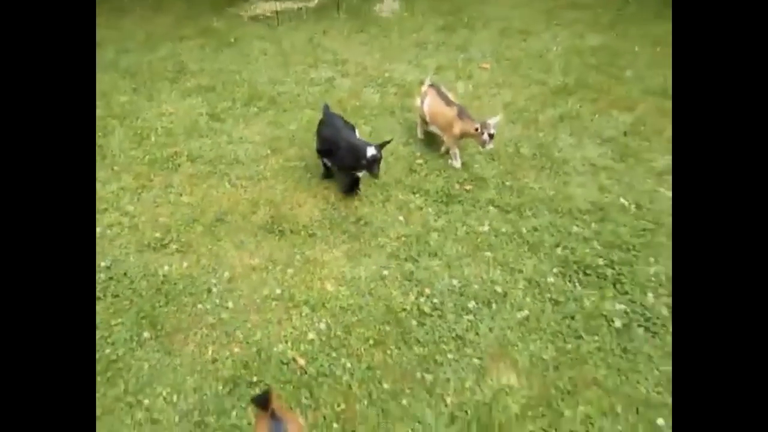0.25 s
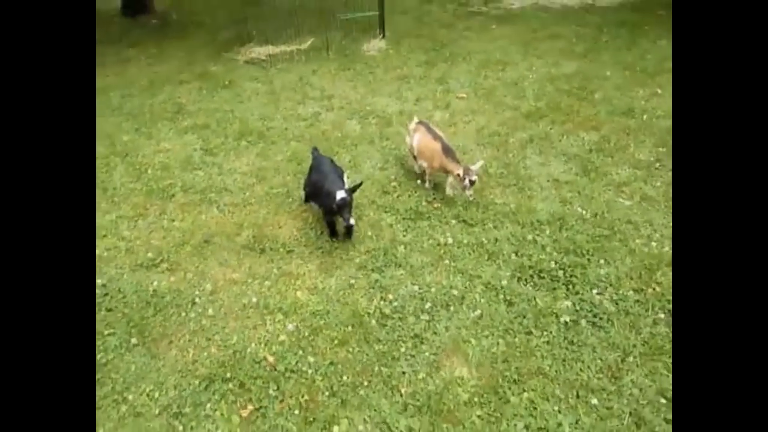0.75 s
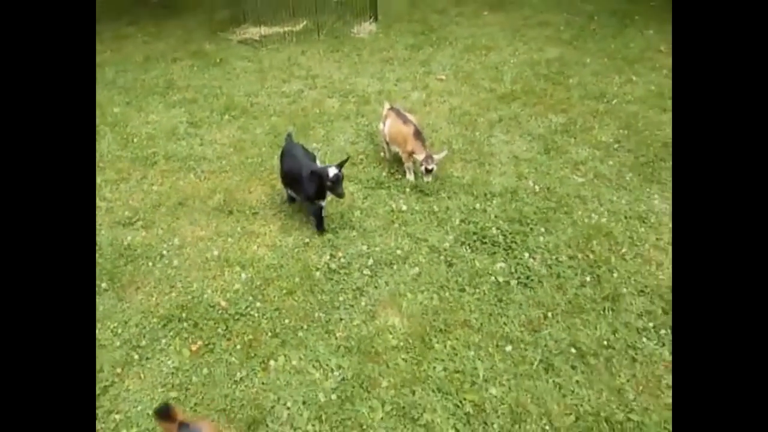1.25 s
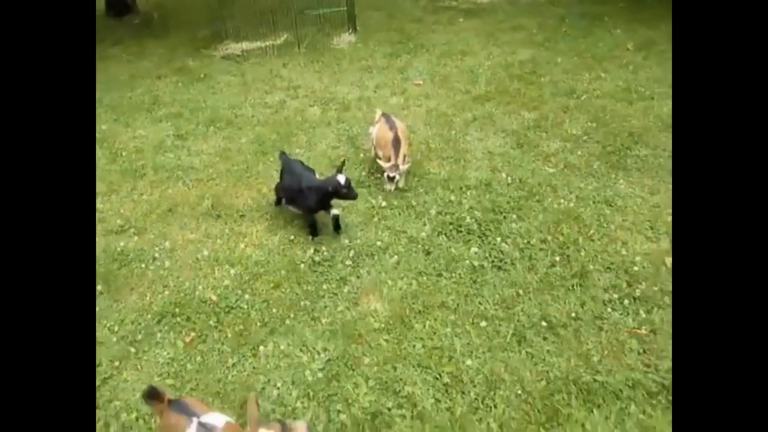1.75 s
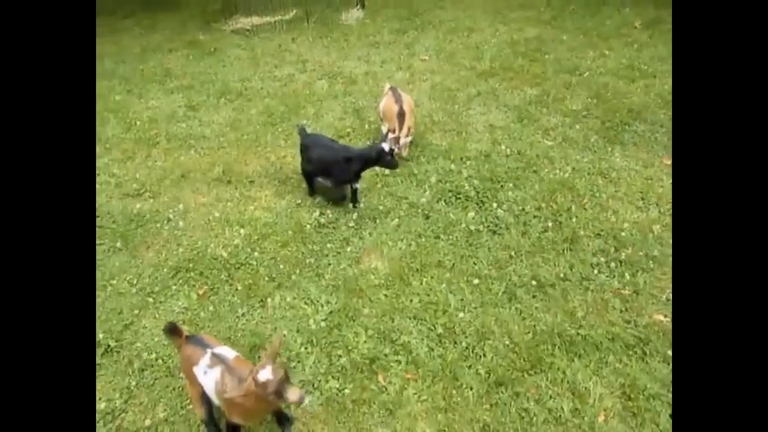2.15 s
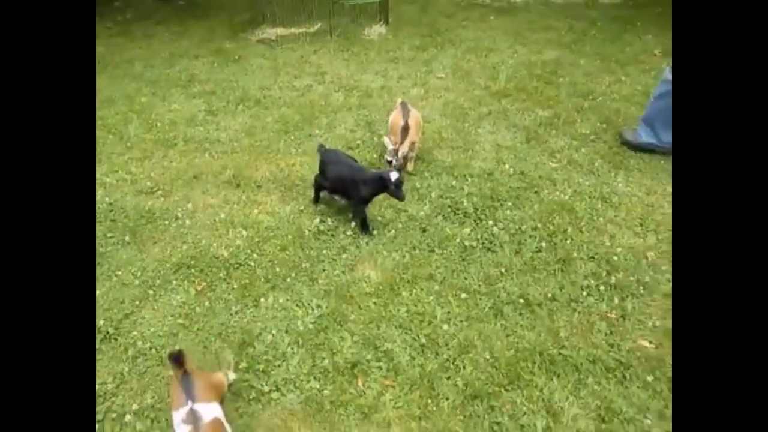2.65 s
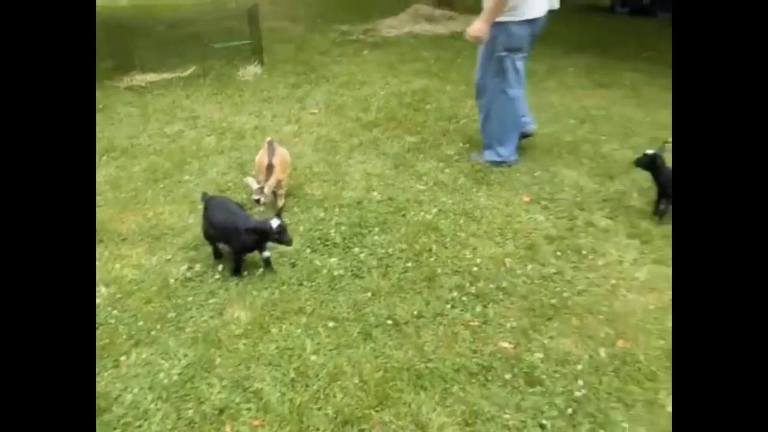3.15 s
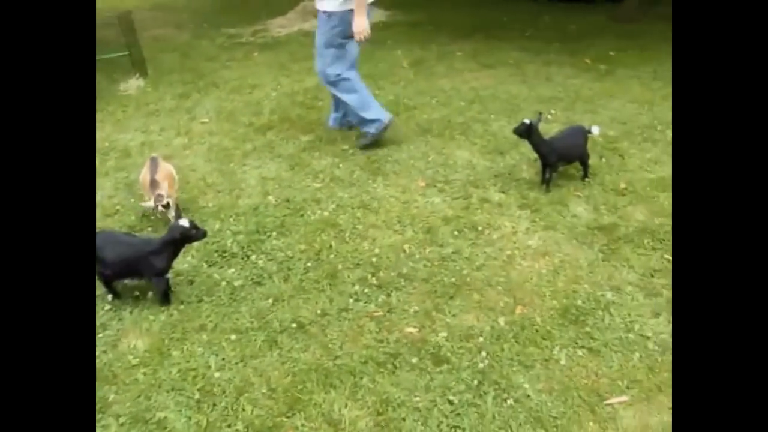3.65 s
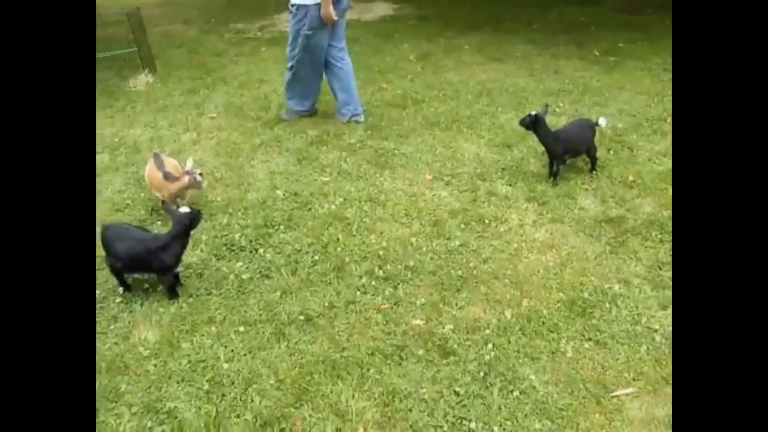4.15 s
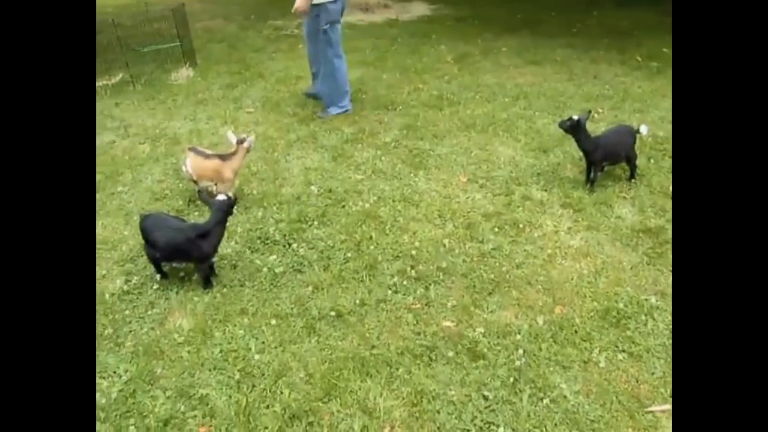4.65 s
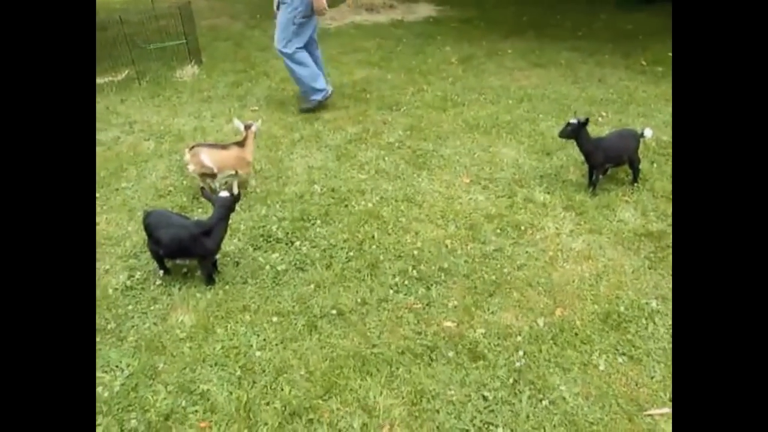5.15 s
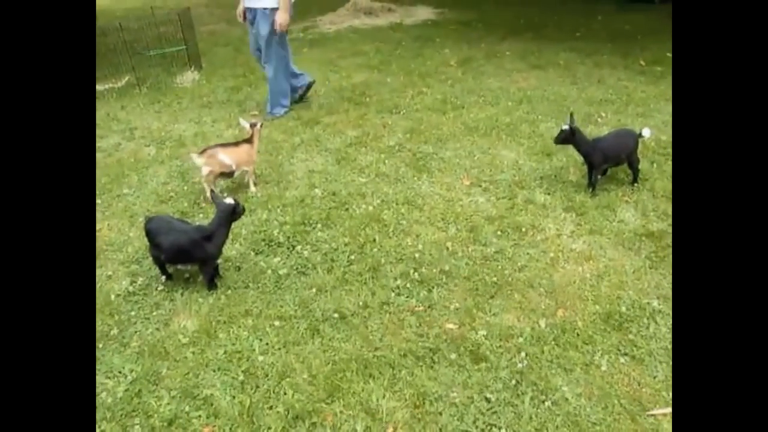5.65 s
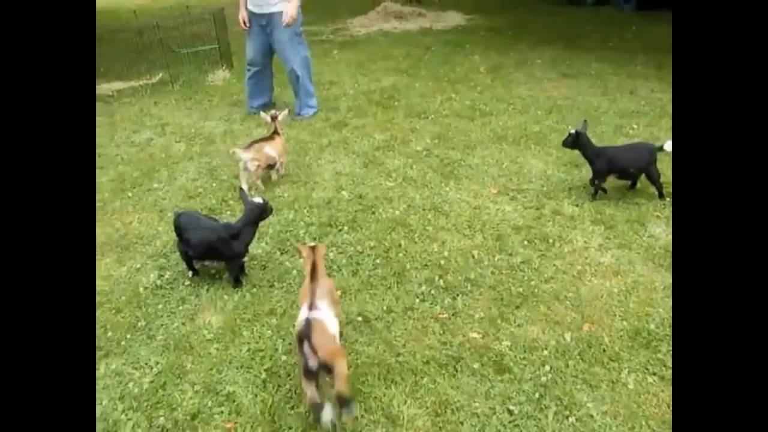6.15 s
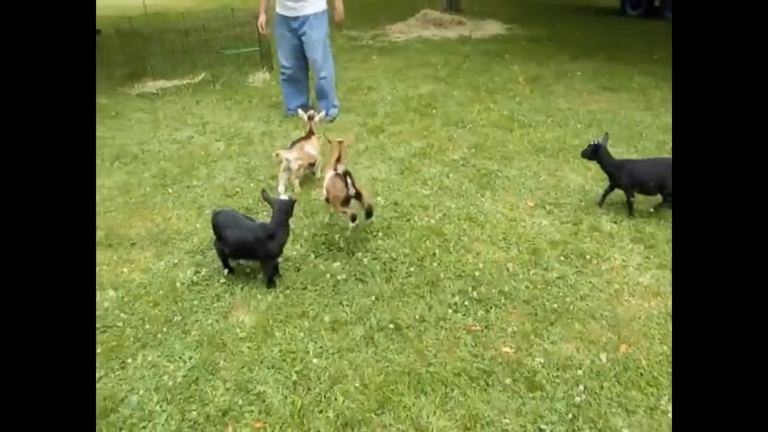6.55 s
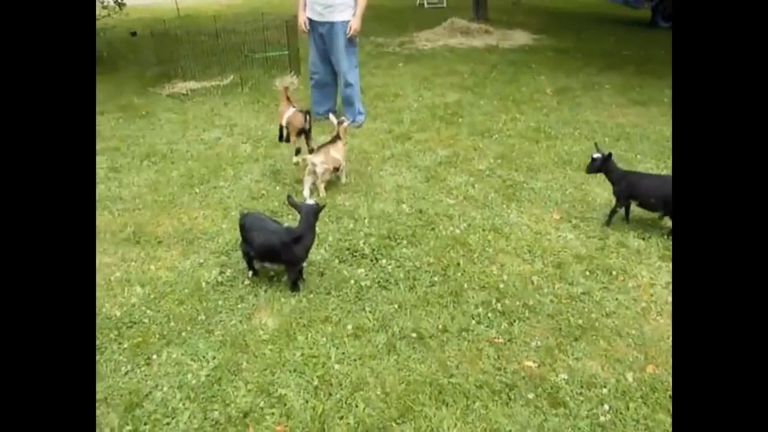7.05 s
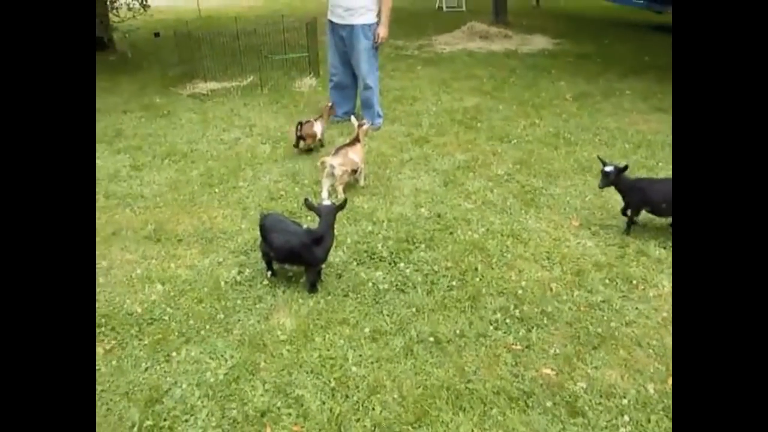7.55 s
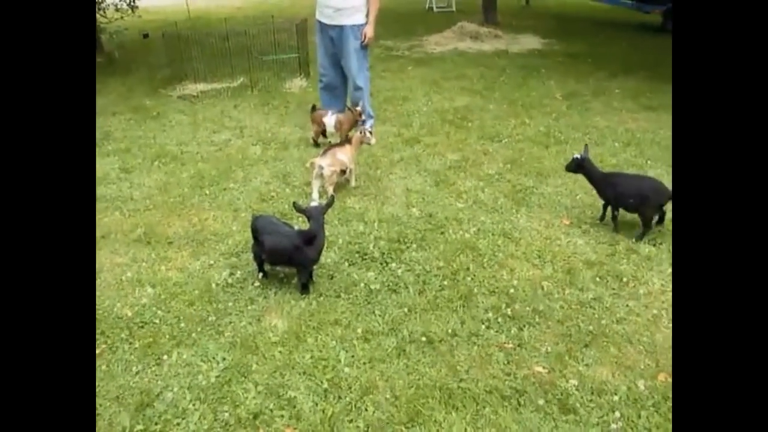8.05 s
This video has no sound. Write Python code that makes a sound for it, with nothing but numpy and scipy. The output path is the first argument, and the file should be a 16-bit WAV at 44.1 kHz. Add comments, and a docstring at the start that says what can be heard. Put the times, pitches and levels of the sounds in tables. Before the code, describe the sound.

Light wind rumble and a soft outdoor hiss run throughout, picked up by a hand-held camera with dull treble. For the first 1.5 seconds a hand bumps, rubs and squeaks on it, among tiny snaps and short high hisses. A goat kid bleats softly at about 0.7 seconds, and a faint quavering cry comes around 2.5. A low thud lands at 3. From 3.4 to 5.4 seconds come louder, close bleats, hoarse, nasal and throbbing, strongest near 3.6, 4.3 and 5. A thinner, shrill, trembling bleat swells at about 6 seconds. Stalks snap around 6.7, and dull hoof thuds on turf follow between 7 and 8. In the background one songbird repeats faint runs of falling chirps while another whistles short phrases farther off. A distant engine hum grows slowly louder until the end, just past 8 seconds.

```python
"""On a lawn, goat kids bleat in short quavering runs, close to a small hand-held camera.
Each bleat is a string of throbs: pushes of air that make the vocal folds buzz through the throat.
One songbird repeats falling chirps, another whistles farther off, stalks snap and hooves thud.
Wind rumbles, short high hisses come and go, and a far engine hums, slowly growing louder.
The hand on the camera bumps, squeaks and rubs, and the camera cuts off the high treble."""
import sys
import numpy as np
from scipy import signal
from scipy.fft import rfft, irfft, next_fast_len
from scipy.io import wavfile

SR = 44100
rng = np.random.default_rng(int(sys.argv[2]) if len(sys.argv) > 2 else 0)


def master(y):
    """Save y as 16-bit WAV."""
    cut = np.clip(np.atleast_2d(y).T, -1, 1)
    pcm = np.round(cut * 32767)  # scale
    wavfile.write(sys.argv[1], SR, pcm.astype(np.int16))


N = 366030
TIME = np.arange(N) / SR
TREBLE_LIMIT_HZ = 7150


def amp(db):
    """Turns decibels into a number to multiply by."""
    return 10 ** (np.asarray(db) / 20)


def unit(x):
    """Scales a signal to an average (rms) level of 1."""
    return x / np.sqrt(np.mean(x ** 2) + 1e-20)


def read(points, hz):
    """Looks up the level in dB at hz in a table of frequencies and levels."""
    f, db = np.transpose(points)
    return np.interp(np.log(hz + 1), np.log(f + 1), db)


def add(mix, start_s, sound):
    """Mixes a sound in from start_s."""
    start = round(start_s * SR)
    sound = sound[max(-start, 0):]
    part = mix[max(start, 0):][:len(sound)]
    part += sound[:len(part)]


def noise(colour, size):
    """Noise whose strength at each frequency follows colour(hz)."""
    full = next_fast_len(size)
    spectrum = rfft(rng.standard_normal(full)) * colour(np.fft.rfftfreq(full, 1 / SR))
    return unit(irfft(spectrum, full)[:size])


def wander(hz, size):
    """A smooth random wobble, up to about hz times a second."""
    return noise(lambda f: 1 / (1 + (f / hz) ** 4), size + 4096)[:size]


def band(hz, octaves):
    """A colour for noise: one broad hump around hz."""
    return lambda f: 1 / (1 + (np.log2((f + 1) / hz) / octaves) ** 2)


def ring(f, hz, height, half_width_hz=240):
    """A resonance: a peak at hz that falls away on both sides."""
    return height / (1 + ((f - hz) / half_width_hz) ** 2)


def swell(rise_s, fall_s):
    """Time around a peak: t in seconds, and u counted in rises (before it) or falls (after it)."""
    t = np.arange(-4 * rise_s, 4 * fall_s, 1 / SR)
    return t, np.where(t < 0, t / rise_s, t / fall_s)


def beats(first_s, last_s, gap_s):
    """Even times from first to last, about gap_s apart."""
    return np.linspace(first_s, last_s, round((last_s - first_s) / gap_s) + 1)


# The colour of the outdoor hiss: frequency_hz, relative_db
AIR_COLOUR = [(12, -36.5), (20, 5.5), (65, -8), (82, 4.5), (130, -5), (194, -9.5), (401, -12), (462, -13.5),
              (570, -14), (656, -16), (1020, -15), (1490, -19), (2670, -22.5), (4270, -27), (5400, -28.5),
              (7020, -61), (11900, -120)]
# How hard the wind blows on the microphone: time_s, level_db
WIND_LEVELS = [(0, -36.5), (1.4, -40.5), (1.65, -47.5), (2.2, -37.5), (2.7, -40.5), (5.6, -42.5),
               (6.9, -41), (7.5, -35), (8.3, -37)]
def air(hiss_db=-42, leaves_db=-52):
    """Outdoor hiss, lumpy wind rumble and a slight stir of leaves."""
    hiss = noise(lambda f: amp(read(AIR_COLOUR, f)) * f / (f + 90), N) * amp(.5 * wander(11, N))
    wind_db = np.interp(TIME, *np.transpose(WIND_LEVELS)) + wander(4.9, N)
    rumble = noise(band(44, .4), N) * amp(wind_db)
    leaves = noise(band(3500, 1), N) * amp(wander(17, N))
    return amp(hiss_db) * hiss + rumble + amp(leaves_db) * leaves


# The engine's blurred upper tones: pitch_hz, half_width_hz, relative_db
ENGINE_TONES = [(117, 8.7, -9.5), (467.7, 17, -7.5), (920, 40, -12), (1010, 78, -28)]
# The colour of its roar: frequency_hz, relative_db
ROAR_COLOUR = [(60, -2.5), (120, 1.5), (300, -5), (550, 5), (800, 4), (1100, 5), (1500, -12.5),
               (2500, -22.5), (5000, -41)]
# How the whole engine swells: time_s, gain_db
ENGINE_SWELL = [(0, -68.5), (1.7, -56), (2.2, -53), (3.2, -50.5), (4.5, -45), (5.5, -48), (6.3, -43.5),
                (7.4, -44.5), (8.3, -42.5)]
def engine(firing_hz=58, firing_db=2.8, roar_db=-2, drift_hz=2.7, unsteady_db=5):
    """A far engine: its wavering firing note, upper tones and dull roar swell together."""
    phase = 2 * np.pi * np.cumsum(firing_hz + drift_hz * wander(7.2, N)) / SR
    sound = amp(firing_db) * unit(np.sin(phase) * amp(unsteady_db * wander(6.2, N)))
    for hz, half_width_hz, db in ENGINE_TONES:
        sound += amp(db) * noise(lambda f: ring(f, hz, 1, half_width_hz), N)
    sound += amp(roar_db) * noise(lambda f: amp(read(ROAR_COLOUR, f)), N)
    return sound * amp(np.interp(TIME, *np.transpose(ENGINE_SWELL)))


BUMP_HZ, BUMP_S = 48.5, .0089
def thump(peak_s, db, hz):
    """A low swing that dies almost at once; higher ones are shorter."""
    half_length_s = BUMP_S * np.sqrt(BUMP_HZ / hz)
    t, u = swell(half_length_s, half_length_s)
    return peak_s + t[0], amp(db) * .5 ** (abs(u) ** 1.45) * np.cos(2 * np.pi * hz * t)


# Bumps of the hand: peak_s, level_db
BUMPS = [(0.029, -18.5), (.108, -21.5), (0.285, -16.5), (0.459, -24), (.552, -25), (0.826, -24),
         (1.132, -22), (1.206, -20), (1.311, -21), (1.405, -22), (2.203, -25), (3, -18), (3.072, -19.5)]
def camera_bumps():
    """The hand rocks the camera, always at the same low pitch."""
    out = np.zeros(N)
    for peak_s, db in BUMPS:
        add(out, *thump(peak_s, db, BUMP_HZ))
    return out


# Snapping stalks and small knocks: start_s, level_db, decay_s, centre_hz
SNAPS = [(0.0715, -27, 0.0018, 4600), (0.147, -26.5, 0.0048, 2490), (0.789, -33, .009, 1880),
         (2.526, -21, 0.0019, 870), (3.969, -31.5, 0.03, 330), (3.976, -34.5, 0.0061, 2600),
         (6.608, -33, 0.018, 4350), (6.644, -31.5, 0.0024, 4000), (6.733, -30, 0.0045, 3760)]
def stalk_snaps():
    """Each snap is a burst of noise that starts sharply and dies fast."""
    out = np.zeros(N)
    t = np.arange(SR // 20) / SR
    for start_s, db, decay_s, hz in SNAPS:
        add(out, start_s, amp(db) * np.exp(-t / decay_s) * noise(band(hz, octaves=.7), len(t)))
    return out


def glides(notes, waver, waver_hz, octave_db):
    """Unsteady sliding tones, each with one overtone an octave up."""
    out = np.zeros(N)
    for start_s, db, length_s, first_hz, last_hz in notes:
        size = int(length_s * SR)
        hz = np.geomspace(first_hz, last_hz, size) * (1 + waver * wander(waver_hz, size))
        phase = 2 * np.pi * np.cumsum(hz) / SR
        tone = unit(np.sin(phase) + amp(octave_db) * np.sin(2 * phase))
        add(out, start_s, amp(db) * tone * np.sin(np.linspace(0, np.pi, size)))
    return out


# Squeaks of skin: start_s, level_db, length_s, first_hz, last_hz
SQUEAKS = [(.139, -32, 0.014, 2027, 2870), (.234, -26, 0.017, 1010, 1460), (.246, -25.5, 0.026, 1480, 3370)]
def skin_squeaks():
    """Skin slips on the camera with tiny, rough, rising tones."""
    return glides(SQUEAKS, waver=.17, waver_hz=688, octave_db=-7.5)


def grainy_swell(peak_s, db, half_length_s, colour, grain_db=2.5):
    """Grainy noise that swells and fades."""
    t, u = swell(half_length_s, half_length_s)
    grains = unit(noise(colour, len(t)) * amp(grain_db * wander(220, len(t))))
    return peak_s + t[0], amp(db) * .5 ** (u ** 2) * grains


# Rubs of the hand: peak_s, level_db, half_length_s, scuff_hz
RUBS = [(.16, -38, .032, 2530), (0.275, -34.5, 0.029, 554), (0.343, -31.5, 0.038, 3010),
        (0.427, -31, 0.042, 510), (0.832, -37.5, 0.037, 1090), (1.419, -50.5, .04, 1240),
        (1.962, -42.5, .075, 1880), (4.02, -39, 0.071, 3050)]
# The colour all rubs share: frequency_hz, relative_db
RUB_COLOUR = [(180, -39.5), (300, -10), (502, -3), (797, -8.5), (1150, -8), (1220, -10.5), (2760, -5),
              (3370, -16), (4020, -1.5), (6000, -27.5), (7800, -51.5), (13200, -120)]
def hand_rubs(scuff_db=9):
    """The hand slides on the camera; each rub rings at its own scuffing pitch."""
    out = np.zeros(N)
    for peak_s, db, half_length_s, scuff_hz in RUBS:
        def colour(f):
            return amp(read(RUB_COLOUR, f) + ring(f, scuff_hz, scuff_db))
        add(out, *grainy_swell(peak_s, db, half_length_s, colour))
    return out


# Short, high hisses: peak_s, level_db, half_length_s
HIGH_HISSES = [(.26, -41.5, 0.041), (0.421, -29.5, .04), (0.602, -45, 0.031), (0.703, -40, 0.018),
               (0.858, -42, 0.081), (1.537, -41, 0.025), (1.725, -45, 0.11), (2.094, -43.5, 0.031),
               (3.308, -42.5, 0.033)]
def high_hisses():
    """Short, high hisses near 4 kHz swell and fade."""
    out = np.zeros(N)
    for peak_s, db, half_length_s in HIGH_HISSES:
        add(out, *grainy_swell(peak_s, db, half_length_s, band(4060, octaves=.27)))
    return out


# The farther bird's phrases: start_s, relative_db, pitch_hz
PHRASES = [(0.452, -42.5, 3080), (1.699, -38.5, 2850), (2.82, -38, 3050), (4.188, -38, 2680),
           (6.79, -37.5, 2950), (8.06, -43.5, 2530)]
# The three notes of a phrase: delay_s, relative_db, length_s, first_pitch_ratio, last_pitch_ratio
PHRASE_NOTES = [(0, -0.93, 0.12, 1.02, .86), (.1, -0.53, 0.077, 1.1, 1.17), (.15, -1.5, .08, .97, 1.12)]
def bird_whistles():
    """A bird repeats one phrase, higher or lower: a slide down, then two slides up."""
    notes = [(start_s + delay_s, db + note_db, length_s, hz * first, hz * last)
             for start_s, db, hz in PHRASES
             for delay_s, note_db, length_s, first, last in PHRASE_NOTES]
    return glides(notes, waver=.035, waver_hz=130, octave_db=-35)


JITTER, SHIMMER_DB = .005, 2.2  # random wobble of the pitch, and of each overtone's level
BUZZ_LEAD = .15  # the buzz peaks ahead of the hum by this share of the rise
def throb(peak_s, db, pitch, colour, rasp, rise_s, fall_s,
          climb, droop, lead_s, hum_steep, buzz_span, buzz_steep):
    """One push of air shakes a goat's vocal folds; the throat shapes the tone by colour(hz)."""
    t, u = swell(rise_s, fall_s)
    # the pitch climbs, tops out lead_s before the level does, then droops
    arch = (t + lead_s) / .02
    sag = np.where(arch < 0, climb, droop) * arch ** 2
    hz = pitch * (1 - .34 * np.tanh(sag / .26) + JITTER * wander(210, len(t)))
    phase = 2 * np.pi * np.cumsum(hz) / SR
    # the lowest tone swells smoothly with the air
    hum = colour(hz) * np.cos(phase) * .5 ** (abs(u) ** hum_steep)
    # overtones shimmer, and the higher ones lag a little, which spreads each pulse of the folds
    knots = np.linspace(t[0], t[-1], 16)
    shimmer = [amp(SHIMMER_DB * np.interp(t, knots, row)) for row in rng.standard_normal((14, 16))]
    buzz = sum(colour(k * hz) * gain * np.cos(k * phase - .12 * k ** 2)
               for k, gain in enumerate(shimmer, 2))

    def breath_colour(f):
        return colour(np.maximum(f, 2 * pitch)) * (f > 1.2 * pitch) * (f < TREBLE_LIMIT_HZ)
    buzz += rasp * np.std(buzz) * noise(breath_colour, len(t)) * (1 + np.cos(phase))
    # the buzz starts and stops more abruptly, as the folds begin and cease to touch
    voice = hum + buzz * .5 ** (abs((u + BUZZ_LEAD) / buzz_span) ** buzz_steep)
    return peak_s + t[0], amp(db) * voice / np.std(voice[abs(u) < .5])


# The throat's colour with the mouth closed, and with it open: frequency_hz, relative_db
CLOSED_THROAT = [(200, -9), (340, -4.5), (460, 1.5), (620, -17), (900, -14.5), (1350, -28), (1800, -28),
                 (2250, -21), (2800, -28), (3550, -24.5), (4000, -30.5), (4700, -56), (5400, -25)]
OPEN_THROAT = [(420, -40), (880, -4), (1300, 3), (1750, -12.5), (2200, -10), (2650, -6.5), (3100, -11),
               (3600, -6.5), (4100, 1.5), (4500, -8), (4900, -1.5), (5400, 3)]
# Throbs, about ten a second in a bleat: peak_s, level_db, pitch_hz, mouth_opening (0-1), nasal_hz
THROBS = [ (.688, -29.5, 371, .08, 1940), (.808, -31, 355.5, 0.07, 2080), (.916, -28.5, 363.5, 0.09, 1880),
          (2.415, -38.5, 300, 0, 300), (2.512, -33.5, 432, 0.2, 1870), (3.395, -26, 435.5, .22, 3570),
          (3.417, -25, 473.5, 0.15, 3630), (3.503, -18, 477, 0.05, 3200), (3.592, -14.5, 481, 0.01, 2840),
          (3.692, -21, 449.5, .12, 2700), (3.563, -29, 475, 0.44, 2320), (3.675, -34.5, 426.5, .42, 2350),
          (3.795, -20.5, 447, 0.87, 4800), (3.911, -23.5, 432.6, 0.98, 1250),
          (4.028, -30.5, 390, 0.94, 1190), (4.238, -21.5, 428, 0.08, 1080), (4.33, -15, 455.5, 0.01, 2550),
          (4.436, -28.5, 402, 0.17, 2580), (4.8, -27, 446, 1, 1340), (4.922, -26.5, 428.6, .9, 5000),
          (4.728, -34.5, 418, .08, 2710), (4.817, -30.5, 400.6, 0.11, 3100), (4.907, -27, 402, 0.02, 3670),
          (5.005, -14, 451, .14, 5670), (5.104, -15.5, 449, 0.08, 2610), (5.241, -36, 351.5, 0, 940),
          (5.349, -32.5, 353, 0.02, 630), (5.627, -36.5, 348, 0.06, 3070), (5.723, -34, 376, 0, 2700),
          (6.176, -27, 432.4, 0.18, 5300), (6.266, -29.5, 401, 0.1, 3420)]
def hoarse_bleats(overtones_db=-3):
    """With the mouth closed a throb is short, hoarse and nasal; open, it is longer and cleaner."""
    out = np.zeros(N)
    for peak_s, db, pitch, opening, nasal_hz in THROBS:
        def mouth(closed, wide):
            return closed + (wide - closed) * np.clip(opening, 0, 1)

        def colour(f):
            throat_db = mouth(read(CLOSED_THROAT, f), read(OPEN_THROAT, f))
            nasal_db = ring(f, nasal_hz, mouth(12, 4))
            return amp(throat_db + nasal_db + overtones_db * np.clip(f / pitch - 1, 0, 1))
        add(out, *throb(peak_s, db, pitch, colour, rasp=mouth(.31, .16),
                        rise_s=mouth(.0082, .023), fall_s=mouth(.008, .013),
                        climb=mouth(.05, .053), droop=mouth(.17, .11), lead_s=.0049,
                        hum_steep=mouth(1.7, 2.1),
                        buzz_span=mouth(1.45, 1.05), buzz_steep=mouth(2.6, 2.7)))
    return out


# The songbird's runs of chirps: first_chirp_s, last_chirp_s, level_db, middle_pitch_hz
CHIRP_RUNS = [(1.131, 1.362, -46, 3900), (2.817, 3.164, -44, 4170), (4.415, 4.661, -41.5, 3900),
              (6.203, 6.311, -50, 3820), (7.49, 7.825, -43.5, 4280), (8.054, 8.152, -45, 3390)]
def bird_chirps(half_length_s=.014, octaves_per_s=11, gap_s=.116, fade_db=.9):
    """A songbird sings pure notes that slide quickly down, fading a little along each run."""
    out = np.zeros(N)
    t, u = swell(half_length_s, half_length_s)
    for first_s, last_s, db, middle_hz in CHIRP_RUNS:
        for k, peak_s in enumerate(beats(first_s, last_s, gap_s)):
            hz = middle_hz * 2 ** (-octaves_per_s * t) * (1 + .012 * wander(90, len(t)))
            tone = unit(np.sin(2 * np.pi * np.cumsum(hz) / SR))
            level = amp(db - k * fade_db + 2.6 * wander(90, len(t)))
            add(out, peak_s + t[0], level * .5 ** (u ** 2) * tone)
    return out


# The throat's colour in a shrill cry: frequency_hz, relative_db
SHRILL_THROAT = [(530, -9.5), (800, -28.5), (1080, 2.5), (1300, 7), (1630, -24.5), (2200, -13.5),
                 (2720, -11.5), (3260, -19), (3800, -20), (4350, -19), (4900, -21.5), (5400, -17.5)]
# Shrill cries: top_pitch_hz, starts_flat_by (share of the pitch), ring_hz, list of (time_s, level_db)
SHRILL_BLEATS = [(539.6, 0.06, 2100, [(2.586, -37.5), (2.68, -35), (3.022, -41)]),
                 (553.3, 0.075, 1380, [(5.811, -37.5), (5.893, -34), (6.04, -15.5), (6.141, -18.5)])]
def shrill_bleats(quaver_s=.085, scoop_s=.085, crack_ratio=1.07, crack_db=-9.5,
                  overtones_db=4, ring_db=7.5):
    """A kid's thin, quavering cry scoops up to its pitch and cracks upward between throbs."""
    out = np.zeros(N)
    shape = dict(rasp=.1, climb=.034, droop=.032, lead_s=.006,
                 hum_steep=2.6, buzz_span=1.15, buzz_steep=2.8)
    for top_hz, flat, ring_hz, levels in SHRILL_BLEATS:
        times_s, levels_db = np.transpose(levels)
        for peak_s in beats(times_s[0], times_s[-1], quaver_s):
            db = np.interp(peak_s, times_s, levels_db)
            pitch = top_hz * (1 - flat * np.exp((times_s[0] - peak_s) / scoop_s))

            def colour(f):
                throat_db = read(SHRILL_THROAT, f) + ring(f, ring_hz, ring_db)
                return amp(throat_db + overtones_db * np.clip(f / pitch - 1, 0, 1))
            add(out, *throb(peak_s, db, pitch, colour, rise_s=.017, fall_s=.017, **shape))
            add(out, *throb(peak_s + quaver_s / 2, db + crack_db, pitch * crack_ratio, colour,
                            rise_s=.012, fall_s=.014, **shape))
    return out


# Hoof steps: peak_s, level_db, pitch_hz
HOOF_STEPS = [(3.036, -16.5, 72), (3.036, -27, 160), (6.955, -24, 253), (6.967, -26, 120),
              (7.005, -20.5, 92), (7.361, -27, 194), (7.397, -25, 101), (7.916, -18, 229)]
def hoof_thuds():
    """Hooves land on the turf with short, dull thumps."""
    out = np.zeros(N)
    for peak_s, db, hz in HOOF_STEPS:
        add(out, *thump(peak_s, db, hz))
    return out


def yard(sound, echo_db, fade_s):
    """Adds thin, scattered echoes from fences and trees; they drop 60 dB in fade_s."""
    t = np.arange(SR // 2) / SR
    echoes = rng.standard_normal(len(t)) * (rng.random(len(t)) < 2000 / SR) * (t > .006)
    tail = echoes * 1000 ** (-t / fade_s)
    return sound + amp(echo_db) * signal.fftconvolve(sound, tail / np.linalg.norm(tail))[:N]


def scene():
    """Everything meets at one microphone; the farther bird's echo is as strong as its direct sound."""
    background = air() + engine()
    handling = camera_bumps() + skin_squeaks() + hand_rubs()
    small_noises = stalk_snaps() + high_hisses()
    far_bird = amp(-7) * yard(bird_whistles(), echo_db=0, fade_s=.45)
    goats = yard(hoarse_bleats() + shrill_bleats(), echo_db=-18.5, fade_s=.21)
    songbird = yard(bird_chirps(), echo_db=-11.5, fade_s=.4)
    return (background + handling + small_noises + far_bird + goats + songbird + hoof_thuds())[None]


def record(dry, input_hz=5420, smooth_hz=5750):
    """The camera keeps every fourth sample; soft smoothing leaves a mirror image of the top treble."""
    def cut_treble(sound, taps, hz, window):
        return signal.oaconvolve(sound, signal.firwin(taps, hz, window=window, fs=SR), "same")
    narrow = cut_treble(dry[0], 121, input_hz, "hamming")
    sampled = 4 * narrow * (np.arange(N) % 4 == 0)
    smooth = cut_treble(sampled, 65, smooth_hz, ("kaiser", 7))
    return cut_treble(smooth, 511, TREBLE_LIMIT_HZ, ("kaiser", 9))[None]


dry = scene()
out = record(dry)
master(out)
```